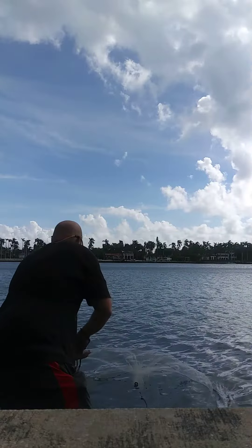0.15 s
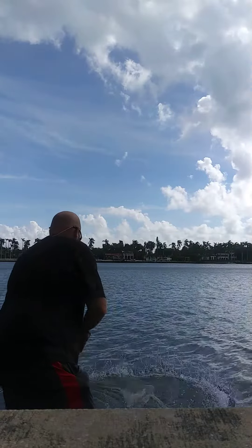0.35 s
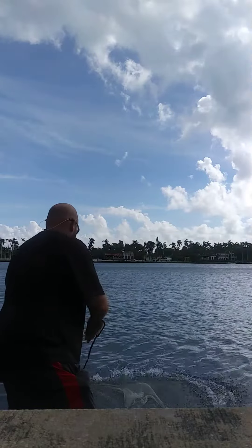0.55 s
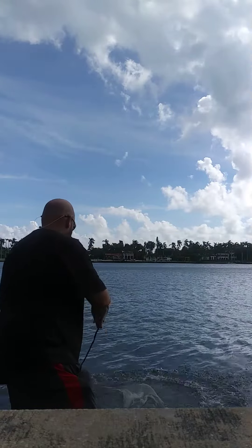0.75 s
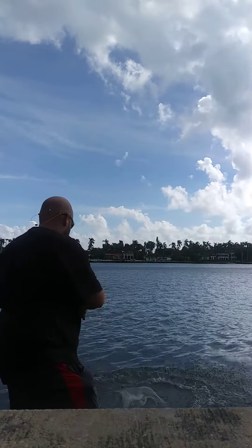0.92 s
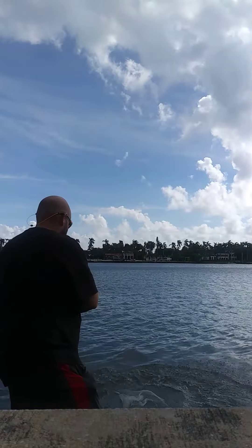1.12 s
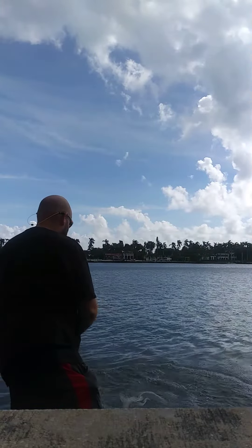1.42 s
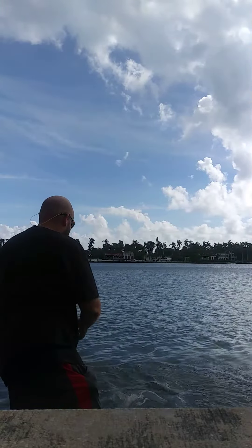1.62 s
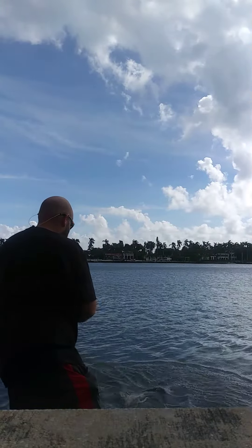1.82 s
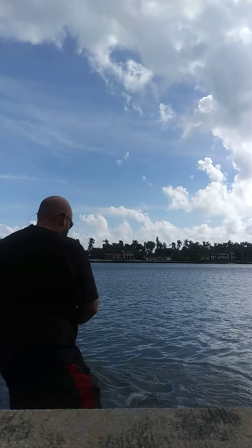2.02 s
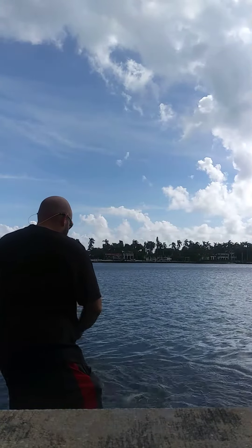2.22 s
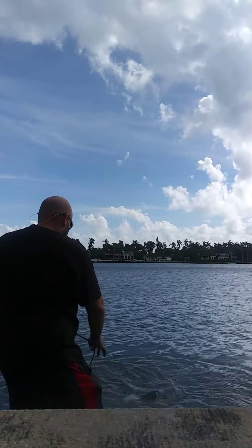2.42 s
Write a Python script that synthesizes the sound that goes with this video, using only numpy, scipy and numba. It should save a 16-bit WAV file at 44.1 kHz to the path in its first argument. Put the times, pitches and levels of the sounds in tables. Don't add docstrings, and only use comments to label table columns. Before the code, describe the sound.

Net splash close by on a lake: sharp slap, gulping plunge, raining droplets, fizz, quiet breeze

```python
import sys
import numpy as np
from scipy import signal
from scipy.fft import rfft, irfft
from scipy.io import wavfile
from scipy.ndimage import uniform_filter1d
from numba import njit

SR = 44100
rng = np.random.default_rng(int(sys.argv[2]) if len(sys.argv) > 2 else 0)


def dump_mix(stems):
    frames = np.atleast_2d(stems).T
    limited = np.clip(frames, -1, 1)
    pcm = np.round(limited * 32767).astype(np.int16)
    wavfile.write(sys.argv[1], SR, pcm)


def volts(x):
    e = np.asarray(x, float) / 20
    return 10 ** e


N = 112454


def level(x):
    return x / np.sqrt(np.mean(x ** 2))


def curve(rows):
    seconds, db = np.array(rows).T[:2]
    return volts(np.interp(np.arange(N) / SR, seconds, db, left=-140, right=-140))


def colour(x, points):
    hz, db = np.array(points).T
    grid = np.maximum(np.arange(2049) * SR / 4096, 1)
    log_gain = np.interp(np.log(grid), np.log(hz), db) * np.log(10) / 20
    cepstrum = irfft(log_gain)
    cepstrum[1:2048] *= 2
    cepstrum[2049:] = 0
    response = irfft(np.exp(rfft(cepstrum)))
    return signal.fftconvolve(x, response)[:N]


def walk(rate):
    hold = int(SR / rate)
    steps = np.repeat(rng.standard_normal(N // hold + 1), hold)
    smooth = uniform_filter1d(uniform_filter1d(steps, hold), hold)
    return 1.33 * smooth[:N]


@njit
def ring(start, hz, cycles, size, glide, rise):
    out = np.zeros(N + 1)
    for k in range(len(start)):
        fade = hz[k] / cycles[k] / SR
        phase, strength, unswollen = 0., size[k], 1.
        for i in range(start[k], min(N, start[k] + int(6 / fade))):
            phase += min(hz[k] * (1 + glide * fade * (i - start[k])) / SR, .45)
            strength *= 1 - fade
            unswollen *= 1 - min(fade / rise, 1.)
            out[i] += strength * (1 - unswollen) * np.sin(2 * np.pi * phase)
    return out[:N]


def swarm(count, lo_hz, hi_hz, cycles, scatter_db, glide):
    chance = rng.random((count, 4))
    start = (chance[:, 0] * N).astype(np.int64)
    hz = lo_hz * (hi_hz / lo_hz) ** chance[:, 1]
    extra = np.minimum(-np.log(1 - chance[:, 2]), 4.)
    sign = np.sign(chance[:, 3] - .5)
    size = hz * volts(scatter_db * extra) * sign
    return level(ring(start, hz, cycles * (.5 + chance[:, 3]), size, glide, 0.094))


def listed(rows, cycles, glide, rise, early_s):
    seconds, db, hz = np.array(rows).T
    start = ((seconds - early_s) * SR).astype(np.int64)
    return ring(start, hz, cycles + 0 * hz, volts(db), glide, rise)


# (frequency [Hz], level [dB per Hz])
BREEZE_COLOUR = [(30, -34), (64, -7), (270, -3), (480, -9.5), (800, -17.5), (1400, -20.5), (2600, -31.5),
                 (9000, -78)]
# (frequency [Hz], level [dB per Hz])
HISS_COLOUR = [(2200, -7), (4500, -1.5), (7200, -4), (8200, -12.5), (10500, -17), (12500, -29),
               (14800, -19), (15700, -24)]


def air():
    swell_db, flicker_db = .7, 1.2
    wide = rfft(colour(rng.standard_normal(N), BREEZE_COLOUR))
    hz = np.maximum(np.arange(N // 2 + 1) * SR / N, 1)
    breeze, swell = 0, walk(4.42)
    for band in range(19):
        share = np.cos(np.pi / 2 * np.clip(2 * np.log2(hz / 32) - band, -1, 1)) ** 2
        depth = 1 / (1 + band / 3.0)
        gain = volts(depth * (swell_db * swell + flicker_db * walk(12)))
        breeze = breeze + irfft(wide * share, N) * gain
    hiss = level(colour(rng.standard_normal(N), HISS_COLOUR))
    return volts(-38) * level(breeze) + volts(-56.5) * hiss


# (time [s], firing rate [Hz], level [dB])
MOTOR_COURSE = [
    (0, 80.8, -52),
    (.04, 80.7, -45),
    (.25, 80.4, -44),
    (.40, 79.4, -39),
    (.57, 79.3, -39),
    (.64, 79.2, -58),
    (2.55, 79, -70),
]
# (multiple of firing rate, early level [dB], late level [dB])
MOTOR_OVERTONES = [(2, -6, -12), (3, -2, -9), (4, -3, 0), (5, 1, -12), (7, -9, -16), (8, -11, -16),
                   (9, -16, -12)]


def motor():
    t = np.arange(N) / SR
    seconds, hz, db = np.array(MOTOR_COURSE).T
    phase = 2 * np.pi * np.cumsum(np.interp(t, seconds, hz)) / SR
    late = np.clip((t - .25) / 0.087, 0, 1)
    tones = 0
    for multiple, early_db, late_db in MOTOR_OVERTONES:
        gain = volts(early_db + (late_db - early_db) * late + walk(13.8))
        tones = tones + gain * np.sin(multiple * phase + multiple ** 2)
    hum_hz = 133 * (1 + .08 * walk(60))
    hum_phase = 2 * np.pi * np.cumsum(hum_hz) / SR
    hum = volts(4 * walk(14)) * np.sin(hum_phase)
    hum = hum + volts(1 + 4 * walk(14)) * np.sin(2 * hum_phase)
    return np.sqrt(2) * volts(np.interp(t, seconds, db)) * tones + volts(-48) * hum


# (offset [trill rates], level [dB])
TRILL_LINES = [(-2, -3.5), (-1, -8.5), (0, 0), (1, -0.5)]


def insect():
    whistle_hz, trill_hz = 4193, 58.5
    t = np.arange(N) / SR
    lines = 0
    for k, db in TRILL_LINES:
        gain = volts(db + 1.6 * walk(8))
        phase = 2 * np.pi * (whistle_hz + k * trill_hz) * t + k * k + .6 * walk(6)
        lines = lines + gain * np.sin(phase)
    return np.sqrt(2) * volts(-70) * lines


# (time [s], level [dB])
FALLBACK_LEVEL = [
    (.36, -43.5),
    (.41, -40.5),
    (.55, -37),
    (.68, -37),
    (.71, -41.5),
    (.86, -46),
    (.92, -50.5),
    (1.3, -57),
    (2.5, -78),
]
# (time [s], level [dB])
PLUNGE_LEVEL = [
    (.2, -45),
    (.245, -36.5),
    (.27, -28),
    (.31, -25),
    (.34, -26.5),
    (.385, -38.5),
    (.42, -50),
]
# (frequency [Hz], level [dB per Hz])
DROP_COLOUR = [(120, -23.5), (260, -9), (430, 0), (700, -5.5), (1070, -5), (1300, -21.5), (2000, -38)]


def drops():
    bubbles = swarm(count=6000, lo_hz=146.5, hi_hz=1593, cycles=2.5, scatter_db=1.5, glide=0.12)
    bubbles = level(colour(bubbles, DROP_COLOUR))
    return bubbles * (volts(2) * curve(FALLBACK_LEVEL) + curve(PLUNGE_LEVEL))


# (time [s], level [dB])
FLIGHT_LEVEL = [
    (0, -53.5),
    (.13, -58),
    (.2, -70),
]
# (time [s], level [dB])
LANDING_LEVEL = [
    (.15, -54),
    (.175, -37.5),
    (.207, -35.5),
    (.222, -38),
    (.275, -36.5),
    (.302, -27.5),
    (.336, -30.5),
    (.347, -36),
    (.40, -46.5),
]
# (frequency [Hz], level [dB per Hz])
SLAP_COLOUR = [(900, -42), (1400, -1.5), (2000, -0.5), (6800, -5), (8500, -11.5), (11000, -18.5),
               (13000, -36), (15200, -26)]
# (frequency [Hz], level [dB per Hz])
SPRAY_COLOUR = [(900, -22.5), (1350, 0.5), (2000, 2), (6600, -6), (8500, -11), (11000, -21.5), (13000, -34),
                (15500, -26)]


def spray():
    fine = swarm(count=70000, lo_hz=770, hi_hz=17000, cycles=.8, scatter_db=1.0, glide=0.032)
    fizz = swarm(count=14000, lo_hz=1476, hi_hz=14200, cycles=4., scatter_db=3.0, glide=0.071)
    first = level(colour(fine + fizz, SLAP_COLOUR)) * volts(1.04 * walk(250.8))
    rain = level(colour(fine + volts(-0.5) * fizz, SPRAY_COLOUR)) * volts(.7 * walk(150))
    return first * curve(LANDING_LEVEL) + rain * (curve(FALLBACK_LEVEL) + curve(FLIGHT_LEVEL))


# (time [s], peak [dB], pitch [Hz])
POP_EVENTS = [(.161, -27, 7800), (.1954, -36, 7000), (.2034, -16.5, 6700), (.2085, -24, 2960),
              (.2488, -24, 6500), (.2745, -17, 2480), (.3025, -21.5, 2210), (.325, -16, 3400),
              (.3097, -33, 4000), (.3344, -18.5, 7260), (.4833, -30, 5040), (.5164, -31, 9800),
              (.5684, -42, 11000), (.616, -33, 4990), (.8364, -45, 11500), (.8555, -36, 4600),
              (.9314, -43, 8400), (1.0444, -40, 6800), (1.1764, -37.5, 8100), (1.2534, -43, 5000),
              (1.3454, -37.5, 2600), (1.3564, -53, 13000), (1.7594, -51, 10000), (1.7894, -46, 8200),
              (1.8254, -45, 9400), (1.8614, -42, 8800), (1.9144, -49, 10500), (2.4099, -38.5, 6300)]
# (frequency [Hz], level [dB])
PORT_COLOUR = [(9500, 0), (13000, -12), (15500, -9)]


def pops():
    tick = listed(POP_EVENTS, cycles=3., glide=.04, rise=.3, early_s=0)
    click = listed(POP_EVENTS, cycles=.8, glide=.04, rise=.05, early_s=0)
    trail = listed(POP_EVENTS, cycles=28.0, glide=0.059, rise=0.018, early_s=0)
    trail = uniform_filter1d(np.abs(trail), size=12)
    spit = trail * level(colour(rng.standard_normal(N), SPRAY_COLOUR))
    return volts(1) * (tick + volts(-8) * colour(click, PORT_COLOUR) + volts(-7.5) * spit)


# (time [s], peak [dB], pitch [Hz])
CAVITY_EVENTS = [(.214, -18.5, 766), (.231, -22, 574), (.253, -13.5, 675), (.261, -6.5, 438),
                 (.266, -19, 203), (.277, -5.5, 458), (.287, -8, 599), (.300, -15.5, 1070), (.302, -6, 546),
                 (.309, -5.5, 394), (.311, -12, 268), (.320, -9, 295), (.321, -9.5, 685), (.332, -10, 460),
                 (.344, -9, 388), (.355, -11, 406), (.371, -12, 593), (.376, -19, 250), (.399, -28, 340),
                 (.423, -26.5, 330), (.462, -25, 403), (.527, -26, 345), (.6235, -15, 740),
                 (.749, -28, 530), (.779, -28.5, 263)]


def cavities():
    return volts(4) * listed(CAVITY_EVENTS, cycles=2.1, glide=0.023, rise=0.9, early_s=0.00096)


def scene():
    background = air() + motor() + insect()
    splash = drops() + spray() + pops() + cavities()
    echo = np.roll(splash, int(.011 * SR)) * volts(-16)
    return (background + splash + echo)[None]


def band_limit(x):
    return signal.sosfilt(signal.butter(12, 17070, fs=SR, output="sos"), x)


def record(dry):
    rounded = np.tanh(1.574 * dry) / 1.422
    bass_cut = signal.butter(2, 45, "high", fs=SR, output="sos")
    top_cut = signal.ellip(12, .2, 70, 15720, fs=SR, output="sos")
    mix = signal.sosfilt(top_cut, signal.sosfilt(bass_cut, rounded))
    return band_limit(mix)


dry = scene()
out = record(dry)
dump_mix(out)
```